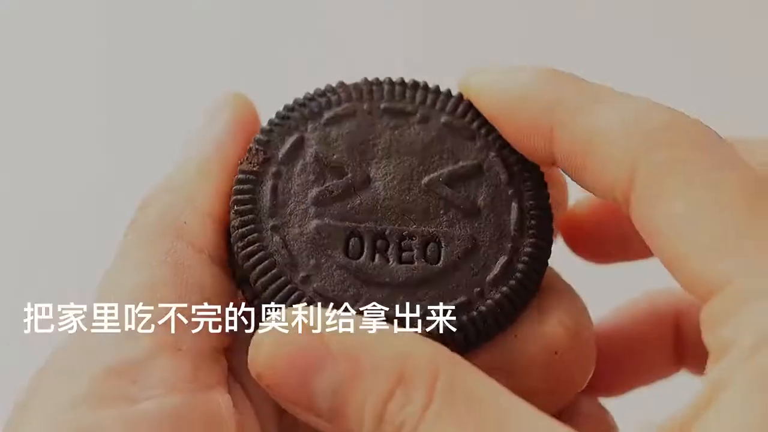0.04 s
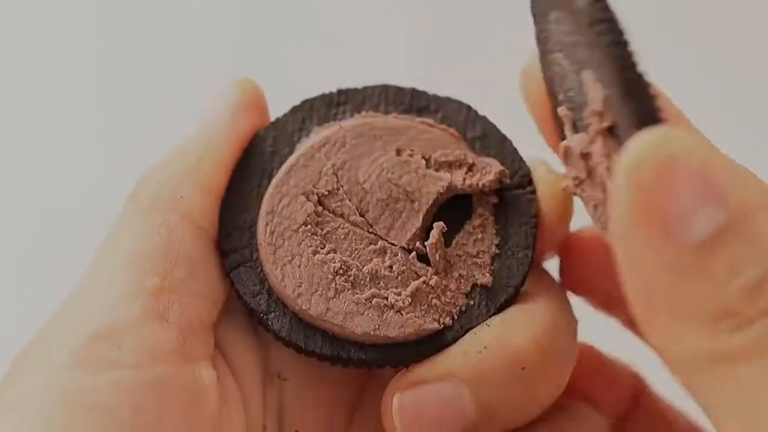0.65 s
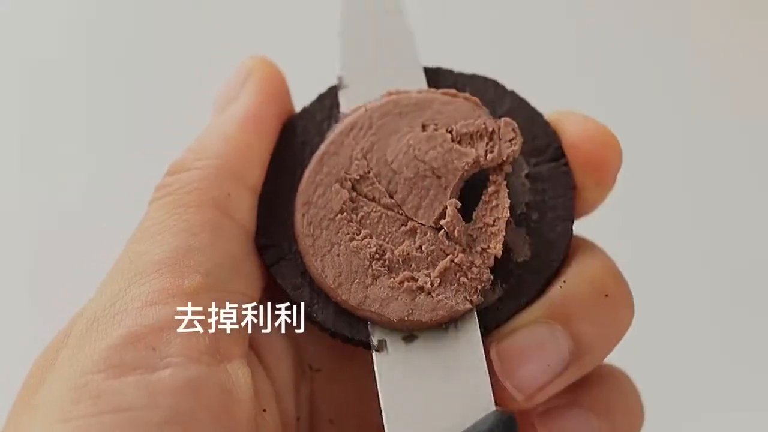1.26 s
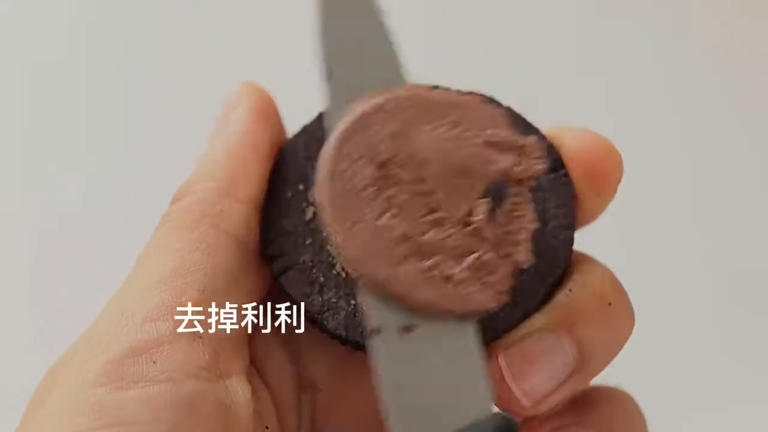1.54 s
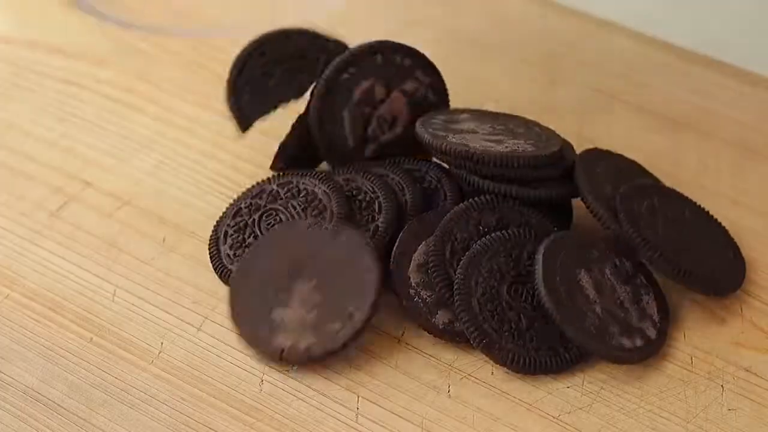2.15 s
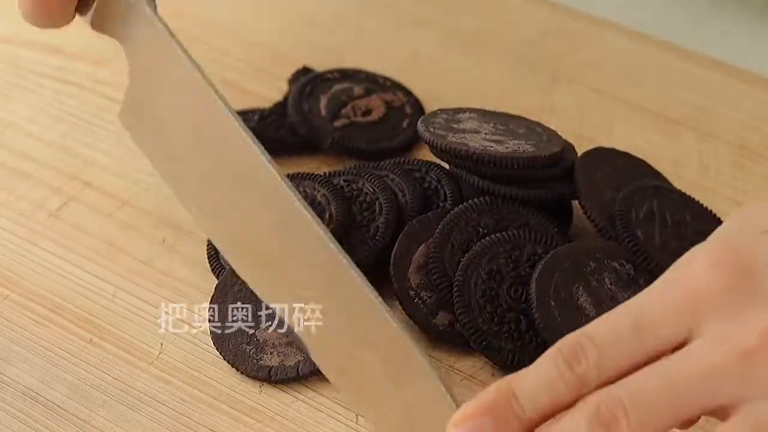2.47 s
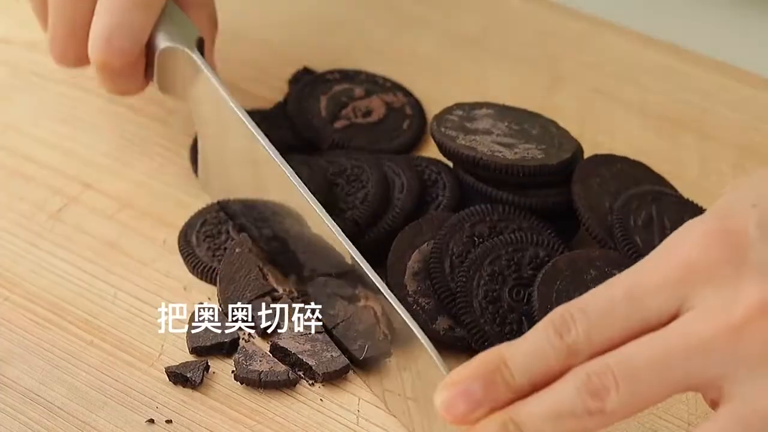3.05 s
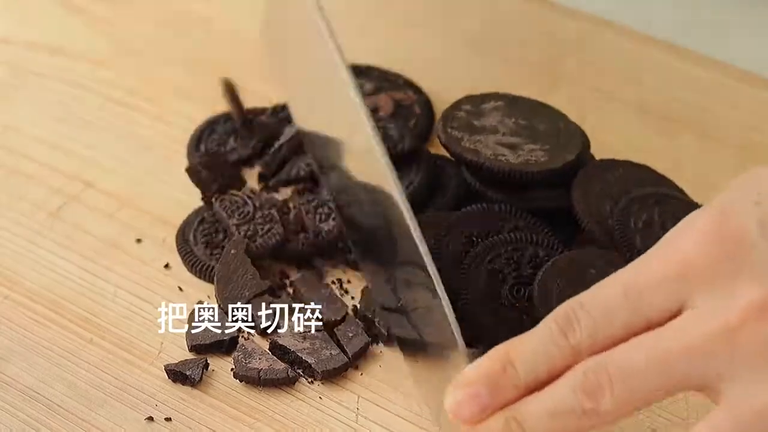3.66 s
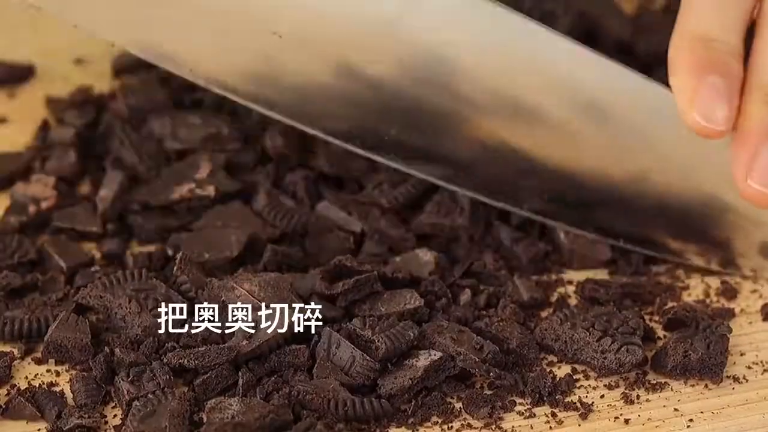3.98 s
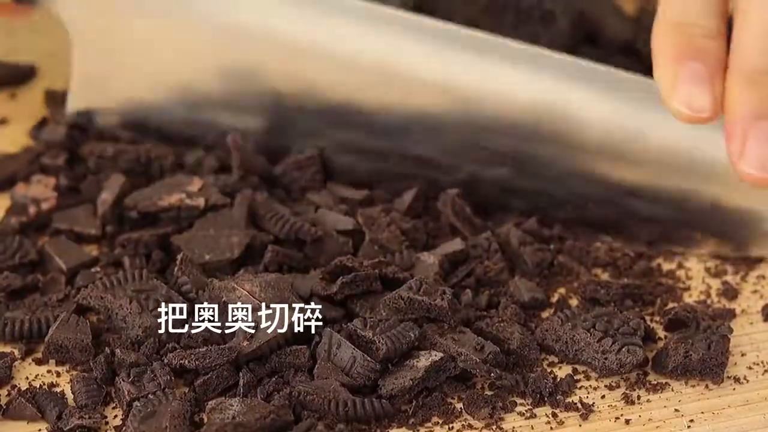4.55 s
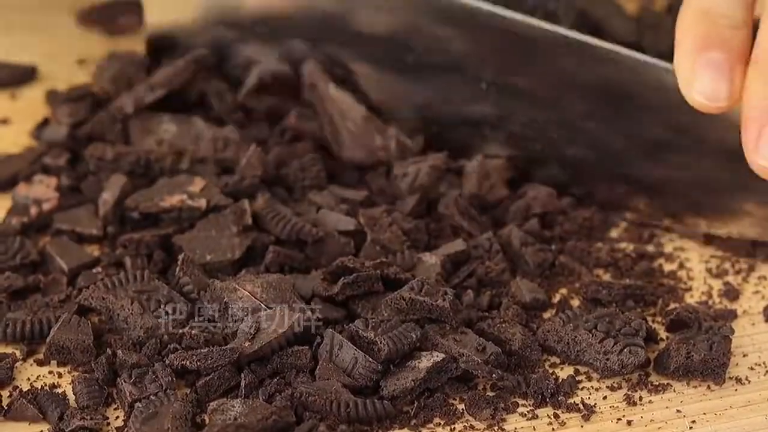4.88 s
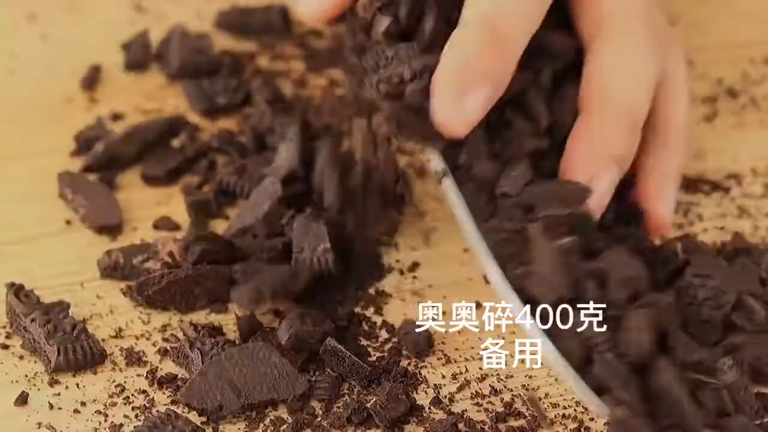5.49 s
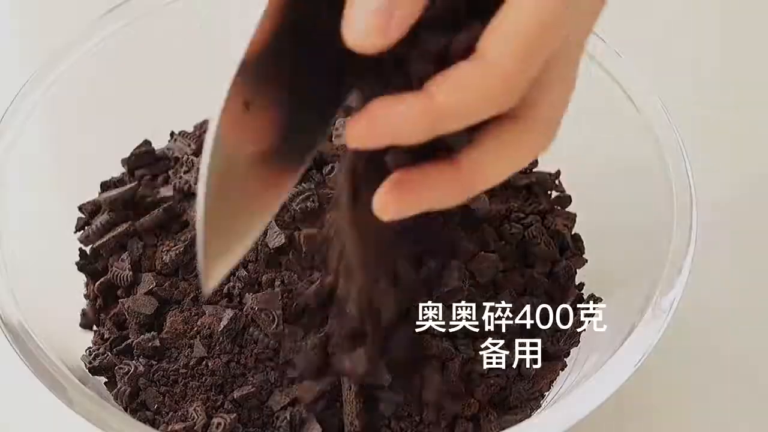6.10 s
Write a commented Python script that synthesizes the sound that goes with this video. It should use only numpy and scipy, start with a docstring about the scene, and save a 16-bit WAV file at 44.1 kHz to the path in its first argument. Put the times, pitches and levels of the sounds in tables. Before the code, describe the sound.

A few short, dry scrapes of a knife on a cookie give way to cookies tumbling from a glass bowl onto wood. Seven evenly paced chops follow, each a crisp crunch with a low knock from the board. Crumbs are scraped together and dropped into the glass bowl, rustling as the blade clinks. The microphone is close, with only a faint kitchen hiss behind.

```python
"""Kitchen, close up, mono. A knife scrapes the filling off a sandwich cookie; cookies tumble from
a glass bowl onto a wooden board; a big knife crunches through them seven times, then sweeps up
the crumbs and drops them in the bowl. Crunching is a swarm of tiny fractures, woody below and
crisp above. Board, blade and bowl ring along over a faint room hiss."""
import sys
import numpy as np
from scipy import signal
from scipy.fft import rfft, irfft, next_fast_len
from scipy.io import wavfile
from scipy.ndimage import uniform_filter1d

SR = 44100
rng = np.random.default_rng(int(sys.argv[2]) if len(sys.argv) > 2 else 0)


def dump(signal):
    """Clip the signal to [-1, 1] and save it as 16-bit WAV at the path in sys.argv[1]."""
    limited = np.clip(np.atleast_2d(signal).T, -1, 1)
    pcm = np.round(limited * 32767).astype(np.int16)
    wavfile.write(sys.argv[1], SR, pcm)


N = 279153

# cookies sliding out of the bowl: t/s, level/dB
POUR_LEVELS = [(1.85, -40), (1.856, -28), (1.968, -12.5), (1.972, -20), (2.182, -19.5), (2.202, -17),
               (2.255, -22)]
# knife strokes: t/s, length/s, first bite/dB, last bite/dB, crisp re bite/dB, landing thud/dB
KNIFE_STROKES = [(2.557, 0.059, -17, -13.5, -4, -25.5), (2.995, 0.097, -11.5, -18, -4.5, -31),
                 (3.429, 0.098, -11.5, -11, -4, -37), (3.75, 0.05, -7.5, -10, -7, -26),
                 (4.07, 0.083, -10.5, -12, -6.5, -30), (4.445, .05, -5.5, -12, -8.5, -41),
                 (4.807, 0.07, -8, -10, -5.5, -19)]
# crumbs swept over the board: t/s, woody/dB, crisp/dB
SWEEP_LEVELS = [(5.03, -32, -48), (5.038, -24.5, -20.5), (5.062, -26.5, -30), (5.128, -17, -12.5),
                (5.142, -19.5, -19.5), (5.294, -18, -20.5), (5.354, -13, -15.5), (5.408, -22.5, -29),
                (5.458, -18.5, -20.5), (5.522, -20, -31.5), (5.654, -36, -37), (5.686, -26, -31),
                (5.83, -35, -47.5), (5.89, -58, -63)]
# crumbs falling into the bowl: t/s, woody/dB, crisp/dB
FALL_LEVELS = [(5.89, -41, -51), (5.922, -27.5, -32), (5.974, -21, -23), (6.036, -28, -36),
               (6.166, -24.5, -21), (6.176, -24, -26), (6.264, -21, -26), (6.28, -22.5, -25),
               (6.33, -25, -39)]
# breaking cookie: f/Hz, level/dB
COOKIE_SPECTRUM = [(150, -35), (250, -15.5), (324, -17.5), (353, -21), (434, -5.5), (583, -5.5), (681, 0),
                   (781, -1.5), (978, 3.5), (2060, 0.5), (3630, -2.5), (5130, -25), (6770, -19),
                   (14000, -26.5), (15500, -24)]


def amp(db):
    return 10 ** (np.asarray(db) / 20)


def unit(x):
    return x / np.sqrt(np.mean(x ** 2) + 1e-20)


def gains(rows):
    """Per-sample gain for each dB column; -120 dB outside the rows."""
    times_s, *columns = np.transpose(rows)
    return [amp(np.interp(np.arange(N) / SR, times_s, db, left=-120, right=-120)) for db in columns]


def swell(at_s, length_s, attack_s, release_s, sag_db_per_s=0):
    """Gain: up 60 dB per attack_s until at_s, sagging hold, down 60 dB per release_s."""
    t = np.arange(N) / SR - at_s
    rise_db = 60 * np.minimum(t, 0) / attack_s
    sag_db = sag_db_per_s * np.clip(t, 0, length_s)
    fall_db = 60 * np.maximum(t - length_s, 0) / release_s
    return amp(np.maximum(rise_db - sag_db - fall_db, -200))


def lingering(force, t60_s):
    """Gain that builds with a force and decays after it."""
    pole = amp(-120 / (t60_s * SR))
    return np.sqrt(signal.lfilter([1 - pole], [1, -pole], force ** 2))


def steadied(x, span_s):
    """x held near rms 1 over span_s; finer grain kept."""
    return x / np.sqrt(abs(uniform_filter1d(x * x, int(span_s * SR) + 1)) + 1e-9)


def filtered(x, response):
    """x through a complex response of f/Hz."""
    size = next_fast_len(N + SR // 2)
    return irfft(rfft(x, size) * response(np.fft.rfftfreq(size, 1 / SR)), size)[..., :N]


def coloured(x, spectrum):
    """x through a minimum-phase filter; rows: f/Hz, level/dB."""
    hz, db = np.transpose(spectrum)
    size = 4096
    shape = amp(np.interp(np.log(np.fft.rfftfreq(size, 1 / SR) + 1), np.log(hz), db))
    cepstrum = irfft(np.log(np.maximum(shape, 1e-6)))
    cepstrum[1:size // 2] *= 2
    cepstrum[size // 2 + 1:] = 0
    return signal.fftconvolve(x, irfft(np.exp(rfft(cepstrum))))[:len(x)]


def ringing(x, modes):
    """x through resonances; unity power gain for white input."""
    def response(f):
        h = sum((-1) ** k * amp(db) * 1j * f * width_hz / (hz * hz - f * f + 1j * f * width_hz)
                for k, (hz, width_hz, db) in enumerate(modes))
        return h / np.sqrt(np.mean(abs(h) ** 2))
    return filtered(x, response)


def singing(tones, width_hz, flutter_db):
    """Modes kept ringing by many small blows that jog phase and strength."""
    t, out = np.arange(N) / SR, np.zeros(N)
    knots_s = np.arange(0, N / SR + 1, 1 / 30)
    for hz, db in tones:
        drift = np.cumsum(rng.standard_normal(N)) * np.sqrt(2 * np.pi * width_hz / SR)
        flutter = np.interp(t, knots_s, rng.standard_normal(len(knots_s)))
        out += amp(db + flutter_db * flutter) * np.sqrt(2) * np.sin(2 * np.pi * hz * t + drift)
    return out


def fractures(rate_per_s, spread_db, cycles, dust):
    """Micro-cracks: each clicks and rings its own fragment, over noise of fine dust."""
    count = int(rate_per_s * N / SR)
    when, size, pitch, damping = rng.random((count, 4)).T
    t = np.arange(256) / SR
    hz = 700 * 20 ** pitch[:, None]
    ring = np.sin(2 * np.pi * hz * t) * np.exp(-hz * t / (cycles * (.5 + damping[:, None])))
    # small fragments ring higher and harder: the swarm stays white
    ring *= np.sqrt(hz / hz.mean()) / np.linalg.norm(ring, axis=1, keepdims=True)
    ring[:, 0] += 1  # click
    strength = amp(spread_db * np.minimum(-np.log(1 - size), 4)) * np.sign(damping - .5)
    index = (when * N).astype(int)[:, None] + np.arange(len(t))
    swarm = np.bincount(index.ravel(), (ring * strength[:, None]).ravel(), N)[:N]
    return unit(swarm) + dust * rng.standard_normal(N)


def shifting(x, depth_db):
    """Resonances of moving pieces come and go within tens of ms."""
    frames = signal.stft(x, nperseg=512)[2]
    field = uniform_filter1d(rng.standard_normal(frames.shape), size=3, axis=0)
    field = uniform_filter1d(field, size=7, axis=1)
    return signal.istft(frames * amp(depth_db * unit(field)), nperseg=512)[1][:N]


def split(x, edge_hz=4750):
    """Woody (low) and crisp (high) bands, each rms 1."""
    return [unit(signal.sosfilt(signal.butter(8, edge_hz, kind, fs=SR, output="sos"), x))
            for kind in ("low", "high")]


def crunch(strengths, spectrum, swarm, woody_db, crisp_db):
    """Woody and crisp bands of one swarm, each following the hand's effort."""
    woody, crisp = split(coloured(swarm, spectrum))
    force, sharpness = strengths
    return (amp(woody_db) * force * steadied(woody, 0.056)
            + amp(crisp_db) * sharpness * steadied(crisp, 0.04))


def room_hiss():
    """Faint steady room noise."""
    # room noise: f/Hz, level/dB
    spectrum = [(15, -70.5), (25, -10.5), (113, -8.5), (148, -13.5), (169, -32), (209, 2.5), (240, -16),
                (281, -6.5), (359, -18.5), (509, -8.5), (1710, -17.5), (2420, -12), (3170, -19),
                (15500, -32.5)]
    return amp(-61.5) * unit(coloured(rng.standard_normal(N), spectrum))


def shaking(chop_force):
    """Board and counter motion, driven by the work above and the blade's landings."""
    t = np.arange(N) / SR
    pour_lands_s, bulk_lands_s, landing_delay_s = 1.96, 5.99, 0.0205
    load = (amp(-32.5) * push_force() + amp(-16) * pour_force() * (t > pour_lands_s)
            + amp(-17) * chop_force + amp(-16) * gains(SWEEP_LEVELS)[0])
    landings = sum(amp(db) * swell(at_s + length_s + landing_delay_s, 0, attack_s=0.11, release_s=0.23)
                   for at_s, length_s, *_, db in KNIFE_STROKES)
    board = np.hypot(lingering(load, t60_s=0.21), landings)
    sway = lingering(board, t60_s=0.97)
    rocking = amp(-11.5) * sway  # counter keeps the board moving
    patter = amp(-8.5) * gains(FALL_LEVELS)[0] * (t > bulk_lands_s)  # the patter does not sway the counter
    return np.hypot(board, rocking) + patter, amp(-12.5) * sway


def thuds(chop_force):
    """The load rocks the board, higher-pitched at its middle; the counter sways below."""
    # board loaded at the edge: f/Hz, width/Hz, level/dB
    edge_modes = [(79, 19, -1), (105.7, 9.4, 5.5), (137.2, 9.8, 2), (210, 16, -10.5), (249.4, 31, -22)]
    # board loaded at the middle: f/Hz, width/Hz, level/dB
    middle_modes = [(93.2, 3.9, 10), (144.5, 18.8, 9), (213, 5, -9), (262, 16.6, -3.5)]
    # counter: f/Hz, width/Hz, level/dB
    counter_modes = [(36.6, 94, 0)]
    board_gain, counter_gain = shaking(chop_force)
    t = np.arange(N) / SR
    on_middle = (t > 1.8) & (t < 2.5) | (t > 3.7) & (t < 5.9)
    blows = rng.standard_normal(N)
    wood = ringing(blows * ~on_middle, edge_modes) + ringing(blows * on_middle, middle_modes)
    wood = filtered(wood, lambda f: f ** 4 / (f ** 4 + 60 ** 4) / (1 + (f / 450) ** 4))
    sway = filtered(ringing(rng.standard_normal(N), counter_modes), lambda f: 1 / (1 + (f / 52) ** 8))
    return board_gain * steadied(wood, 0.046) + counter_gain * steadied(sway, .1)


def blade_pings(hz):
    """Slipping free of the cookies, the blade briefly holds one thin note."""
    # blade lifts: t/s, level/dB
    lifts = [(2.75, -51.5), (3.22, -47), (3.663, -46), (3.935, -41.5), (4.303, -45), (4.674, -42)]
    phase = 2 * np.pi * hz * np.arange(N) / SR + np.cumsum(0.08 * rng.standard_normal(N))
    gain = sum(amp(db) * swell(at_s, length_s=.04, attack_s=.03, release_s=.2) for at_s, db in lifts)
    return gain * np.sin(phase)


def rough_notes():
    """Short rough notes: cookie pieces ring or squeak, and the blade rings as it meets the board."""
    # notes of pieces and blade: t at peak/s, f/Hz, level/dB, half length/s
    notes = [(2.552, 3134, -14.5, 0.011), (3.005, 1539, -15, 0.013), (3.915, 2930, -20.5, 0.014),
             (4.278, 2920, -25, 0.012), (4.624, 2180, -19, 0.013), (4.84, 2350, -11, 0.0055),
             (5.071, 2564, -22, .01), (5.072, 5480, -20.5, 0.018), (5.092, 800, -21, 0.024),
             (5.515, 2300, -12, 0.0045)]
    t, out = np.arange(N) / SR, np.zeros(N)
    for at_s, hz, db, half_s in notes:
        near = abs(t - at_s) < 3 * half_s
        phase = 2 * np.pi * hz * t[near] + np.cumsum(0.179 * rng.standard_normal(N)[near])
        out[near] += amp(db) * np.sqrt(2) * np.sin(phase) * np.exp(-((t[near] - at_s) / half_s) ** 2)
    return out


def blade_clinks():
    """Each hard touch rings the steel modes at new strengths."""
    # touches: t/s, level/dB
    touches = [(6.073, -19), (6.127, -18), (6.279, -8.5)]
    # struck blade: f/Hz, level/dB, t60/s
    modes = [(810, -14, 0.061), (1620, -5.5, 0.28), (2735, -0.5, 0.15), (4090, -3, 0.15), (5660, -13, .12),
             (7590, 0, 0.078), (8400, 0, 0.074), (8630, -6, 0.065), (9850, -2, 0.13), (12340, -8, 0.085)]
    out, t = np.zeros(N + SR), np.arange(SR // 3) / SR
    for at_s, db in touches:
        ring = np.zeros(len(t))
        for hz, mode_db, t60_s in modes:
            decay = amp(mode_db + rng.normal(0, 3.5) - 60 * t / t60_s)
            ring += decay * np.sin(2 * np.pi * (hz * t + rng.random()))
        ring += amp(-60 * t / 0.004) * rng.standard_normal(len(t))  # contact click
        out[round(at_s * SR):][:len(t)] += amp(db + 7.5) * ring / abs(ring).max()
    return out[:N]


def rim_ticks(hz, spacing_hz, t60_s):
    """The last cookies tick the rim, ringing a close pair of glass modes."""
    # rim contacts: t/s, level/dB
    ticks = [(2.279, -18), (2.284, -10), (2.304, -22), (2.327, -30), (2.337, -23)]
    out, t = np.zeros(N + SR), np.arange(SR // 8) / SR
    pair = np.sin(2 * np.pi * hz * t) + np.sin(2 * np.pi * (hz + spacing_hz) * t)
    for at_s, db in ticks:
        out[round(at_s * SR):][:len(t)] += amp(db - 60 * t / t60_s) * pair / 2
    return out[:N]


def falling():
    """Fine crumbs patter on the heap; the bulk follows and rings the glass."""
    # crumbs: f/Hz, level/dB
    spectrum = [(150, -62.5), (250, -2.5), (553, -14.5), (781, -2), (1080, -14.5), (1590, -11),
                (1920, -11.5), (2710, -5), (3160, -10), (3330, -5.5), (4240, -12.5), (5040, -21),
                (8620, -8.5), (9390, -19), (15500, -9)]
    # free-standing bowl: f/Hz, level/dB
    bowl_modes = [(2433, -36.5), (2719, -33.5), (3332, -29), (4150, -39), (5800, -41.5), (6433, -50),
                  (6831, -40.5), (7364, -42.5), (7553, -58), (8899, -34.5), (10174, -37), (12400, -42)]
    swarm = shifting(fractures(rate_per_s=1500, spread_db=4, cycles=9, dust=0.49), depth_db=3.0)
    fine = filtered(swarm, lambda f: f ** 4 / (f ** 4 + 1500 ** 4))
    bulk = np.interp(np.arange(N) / SR, [5.97, 6.03], [.1, 1])
    crumbs = fine + bulk * (swarm - fine)
    contact, = gains([(5.92, -13), (6.03, -7), (6.05, -13), (6.12, -15),
                      (6.18, 8), (6.27, 0), (6.33, -4)])
    bowl = contact * singing(bowl_modes, width_hz=4.3, flutter_db=4)
    return crunch(gains(FALL_LEVELS), spectrum, crumbs, woody_db=-3.0, crisp_db=1.0) + bowl


def sweeping():
    """Grit rolls under the blade and rings it while it is pressed to the board."""
    # grit: f/Hz, level/dB
    spectrum = [(150, -36.5), (250, 10.5), (313, -19), (450, -4), (729, -3), (795, 0.5), (1180, 1),
                (2530, 2.5), (3450, 3), (4790, -23), (5600, -13.5), (8770, -9.5), (9560, -11.5),
                (10200, -11.5), (15500, -9)]
    # sliding blade: f/Hz, level/dB
    blade_modes = [(1717, -35), (2460, -28.5), (3359, -33.5), (5480, -49), (7359, -34), (8699, -28.5),
                   (8926, -49), (10207, -29.5), (12355, -45), (12645, -37)]
    swarm = shifting(fractures(rate_per_s=1600, spread_db=0.5, cycles=3.4, dust=0.64), depth_db=3.0)
    contact, = gains([(5.035, -33), (5.057, -17), (5.063, 6.5), (5.12, 2.5),
                      (5.16, -9), (5.35, -3), (5.55, -35)])
    blade = contact * singing(blade_modes, width_hz=25, flutter_db=7.5)
    fine = filtered(swarm, lambda f: f ** 2 / (f ** 2 + 800 ** 2))
    pressed = np.interp(np.arange(N) / SR, [5.4, 5.55], [1, .1])
    grit = fine + pressed * (swarm - fine)
    return crunch(gains(SWEEP_LEVELS), spectrum, grit, woody_db=-0.57, crisp_db=0.0) + blade


def push_force():
    """Each scraping push catches quickly, eases and slips free."""
    # pushes through the filling: t/s, length/s, level/dB
    pushes = [(0.752, 0.036, -41), (0.795, 0.023, -34.5), (0.862, 0.0036, -29), (0.929, 0.042, -20.5),
              (1.014, .02, -20), (1.039, 0.017, -13.5), (1.121, 0.08, -20), (1.221, 0.062, -22.5),
              (1.342, 0.015, -31), (1.386, 0.0042, -20), (1.42, 0.015, -44)]
    return sum(amp(db) * swell(at_s, length_s, attack_s=0.019, release_s=0.075, sag_db_per_s=119.5)
               for at_s, length_s, db in pushes)


def scraping():
    """A small knife shears the filling off the rough cookie face."""
    # scraped filling: f/Hz, level/dB
    spectrum = [(240, -68), (400, -45.5), (900, -20), (1080, -21), (2220, -15.5), (2840, -2.5), (4560, -15),
                (4920, -16), (9070, -11.5), (12900, -10), (15500, -14.5)]
    rub, = gains([(0.74, -75.5), (0.92, -46), (1.32, -46.5), (1.55, -60)])
    force = push_force() + rub
    sharpness = force ** 1.187  # harder is brighter
    swarm = shifting(fractures(rate_per_s=2000, spread_db=1.0, cycles=2.7, dust=0.66), depth_db=2.5)
    return crunch((force, sharpness), spectrum, swarm, woody_db=-4.5, crisp_db=0.5)


def pour_force(release_s=0.39):
    """Pour strength; once the bowl is empty the last cookies wobble to rest."""
    empty_s, last_db = POUR_LEVELS[-1]
    after_s = np.arange(N) / SR - empty_s
    tail = amp(last_db - 60 * np.maximum(after_s, 0) / release_s)
    return np.where(after_s < 0, gains(POUR_LEVELS)[0], tail)


def pouring():
    """Cookies clatter over each other and rub the hand-damped bowl."""
    # tumbling cookies: f/Hz, level/dB
    spectrum = [(150, -49.5), (250, -27.5), (359, -28.5), (742, 1), (882, -4), (1070, -1), (1850, -7),
                (2090, -5.5), (3890, -6.5), (5040, -33.5), (8320, -18), (9230, -25.5), (15500, -23)]
    # held bowl: f/Hz, level/dB
    bowl_modes = [(855.9, -48), (1190, -25.5), (2444, -27.5), (3004, -44.5), (3967, -39.5), (5798, -43.5)]
    swarm = shifting(fractures(rate_per_s=1000, spread_db=4.5, cycles=1.8, dust=0.66), depth_db=4)
    force = pour_force()
    elapsed_s = np.arange(N) / SR - POUR_LEVELS[0][0]
    contact = force * amp(19 - 15.5 * elapsed_s)  # ever fewer cookies touch the glass
    bowl = contact * singing(bowl_modes, width_hz=45, flutter_db=6)
    return crunch((force, force), spectrum, swarm, woody_db=-2.0, crisp_db=-17.0) + bowl


def snaps():
    """A larger piece breaks or lands: crack, short ring, brief splintering."""
    # snaps and knocks: t/s, level/dB, crisp share before cap/dB, ring f/Hz
    pieces = [(0.515, -44.5, -21, 2750), (0.806, -26, 3, 3830), (0.864, -26, 1, 3800),
              (1.021, -5.5, 3, 2650), (1.119, -16, -3, 3450), (1.337, -23, 0.5, 3200),
              (1.484, -33.5, 0, 3330), (1.963, -0.5, -27, 2316), (1.987, -5, -21, 2490),
              (2.017, -2.5, -18, 1290), (2.038, -3, -36, 2120), (2.114, 2.5, -31, 1537),
              (2.203, 0.5, -24, 1810), (2.26, -10.5, -23, 1030), (2.278, -7.5, -11, 1860),
              (2.284, 2, -5, 3810), (2.304, -9, -10, 3870), (2.359, -17.5, -6, 786), (2.547, -6, -10, 1490),
              (2.553, -1.5, -31.5, 3050), (2.981, -3, -1.5, 2900), (2.996, -1.5, -4, 1670),
              (3.422, 3, -3.5, 1140), (3.487, -4, -8, 1227), (3.517, -3, -9, 1810),
              (3.602, -12, -9.5, 2880), (3.659, -22.5, -20, 2810), (3.738, -0.5, -1.5, 2025),
              (4.045, -14.5, -2, 890), (4.071, -13, -21, 2630), (4.616, -9.5, -4.5, 2040),
              (4.695, -19, -1.5, 3560), (4.798, -7, -5, 3430), (5.061, -11, -8, 2500),
              (5.095, -4, 11, 2810), (5.513, -3, -27, 2400), (5.558, -8, -6, 2750), (5.68, -12.5, -9, 3900),
              (5.79, -17.5, -5.5, 2640), (5.948, -19, 3, 3950)]
    out, t = np.zeros(N + SR), np.arange(SR // 8) / SR
    crack, splinters = amp(-60 * t / 0.0042), amp(-4 - 60 * t / 0.037)
    for at_s, db, crisp_db, hz in pieces:
        burst = rng.standard_normal(len(t)) * (crack + splinters)
        woody, crisp = split(coloured(burst, COOKIE_SPECTRUM))
        ring = unit(np.sin(2 * np.pi * hz * t) * amp(-60 * t / 0.035))
        share = np.clip(amp(crisp_db), 0, .95)
        snap = np.sqrt(1 - share ** 2) * unit(woody + 1.06 * ring) + share * crisp
        out[round(at_s * SR):][:len(t)] += amp(db + 0.5) * snap / abs(snap).max()
    return out[:N]


def chop_strengths():
    """Woody and crisp gains: the knife bites, eases, bites again; pieces settle and are stirred."""
    # blade stirring the pieces: t/s, length/s, level/dB
    stirs = [(2.41, .1, -56.5), (2.845, 0.037, -61.5), (3.269, 0.043, -43), (3.588, 0.011, -34),
             (3.658, 0.02, -44), (3.857, 0.082, -27), (4.213, 0.054, -23), (4.323, 0.071, -42.5),
             (4.417, 0.019, -21), (4.564, 0.064, -23.5), (4.666, 0.13, -37), (4.949, 0.056, -27)]
    attack_s, dull_db_per_s, max_dull_db = 0.046, 130, 7.5
    t = np.arange(N) / SR
    stir = sum(amp(db) * swell(at_s, length_s, attack_s=.03, release_s=0.18, sag_db_per_s=43)
               for at_s, length_s, db in stirs)
    woody_power, crisp_power = stir ** 2, (amp(-9.5) * stir) ** 2
    for at_s, length_s, first_db, last_db, crisp_db, _ in KNIFE_STROKES:
        depth = np.clip((t - at_s) / length_s, 0, 1)
        slack_db = 3 * np.sin(np.pi * depth) ** 2  # between top and bottom cookie
        force = amp(first_db + (last_db - first_db) * depth - slack_db)
        bite = force * swell(at_s, length_s, attack_s, release_s=0.095)
        settle = force * amp(-13.5) * swell(at_s, length_s, attack_s, release_s=0.46)
        dull_db = np.clip(dull_db_per_s * (t - at_s), 0, max_dull_db)  # buried edge loses crispness
        woody_power += bite ** 2 + settle ** 2
        crisp_power += (amp(crisp_db - dull_db) * bite) ** 2 + (amp(-15.5) * settle) ** 2
    return np.sqrt(woody_power), np.sqrt(crisp_power)


def chopping(force, sharpness):
    """The big knife crushes stacks of cookies and stirs the pieces."""
    swarm = shifting(fractures(rate_per_s=1700, spread_db=3.0, cycles=2.5, dust=1.0), depth_db=3.5)
    return crunch((force, sharpness), COOKIE_SPECTRUM, swarm, woody_db=-1.42, crisp_db=1.35)


def scene():
    """All sources close up; both channels equal."""
    force, sharpness = chop_strengths()
    cookies = scraping() + pouring() + chopping(force, sharpness) + sweeping() + falling() + snaps()
    tones = rough_notes() + blade_clinks() + blade_pings(hz=4790)
    glass = rim_ticks(hz=8040, spacing_hz=370, t60_s=0.021)
    return np.tile(room_hiss() + thuds(force) + glass + tones + cookies, (2, 1))


def record(dry):
    """Soft clip near full scale, then a steep low-pass."""
    ceiling, top_hz = .95, 15750
    clipped = dry / (1 + abs(dry / ceiling) ** 6) ** (1 / 6)
    return filtered(clipped, lambda hz: .5 - .5 * np.tanh((hz - top_hz) / 120))


dry = scene()
out = record(dry)
dump(out)
```